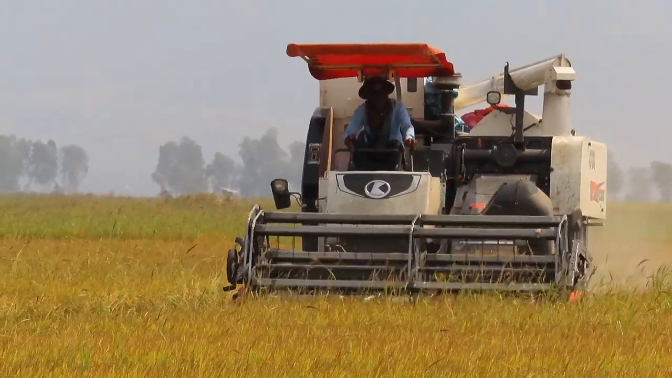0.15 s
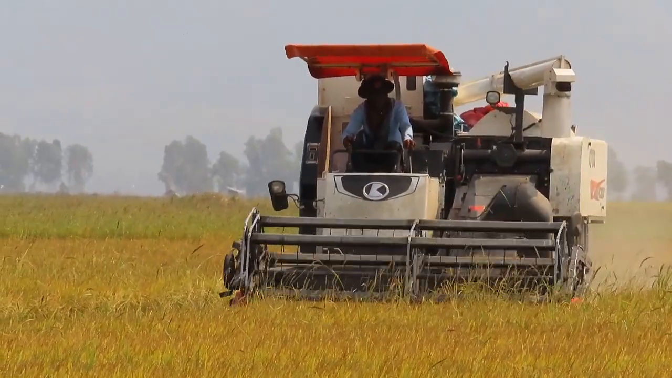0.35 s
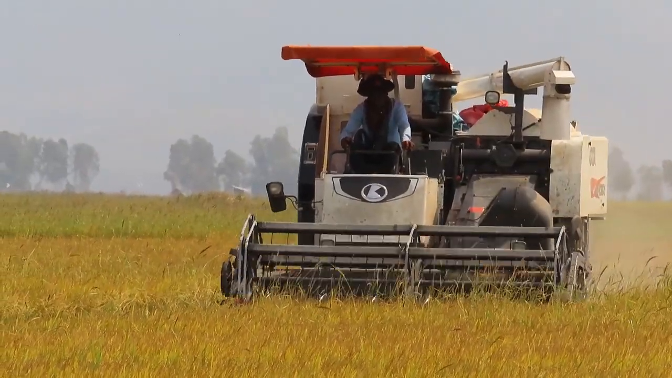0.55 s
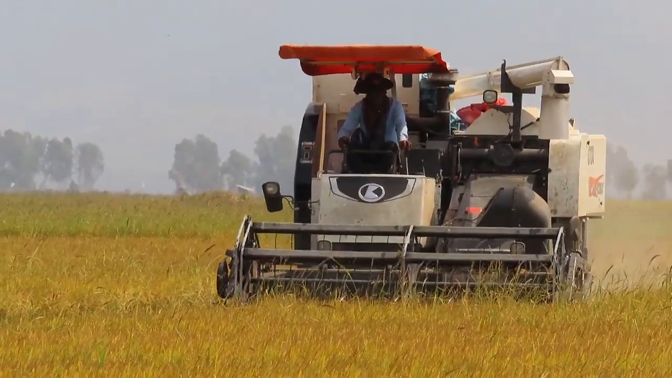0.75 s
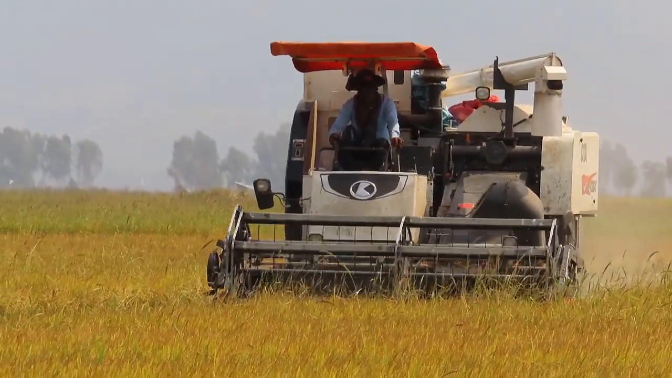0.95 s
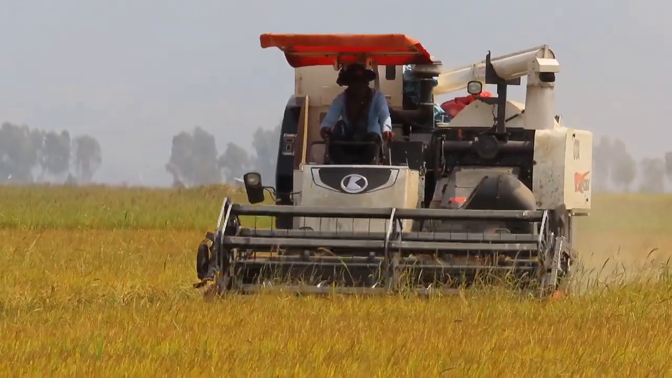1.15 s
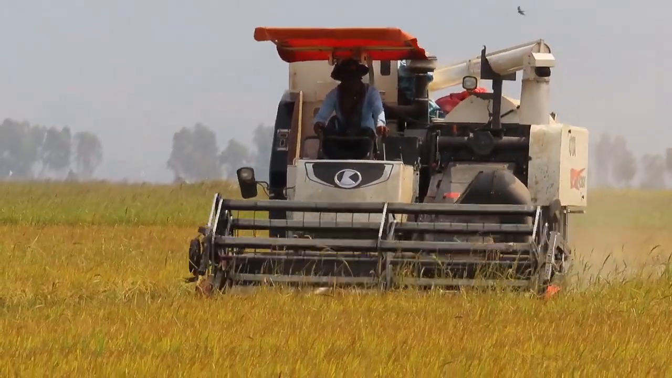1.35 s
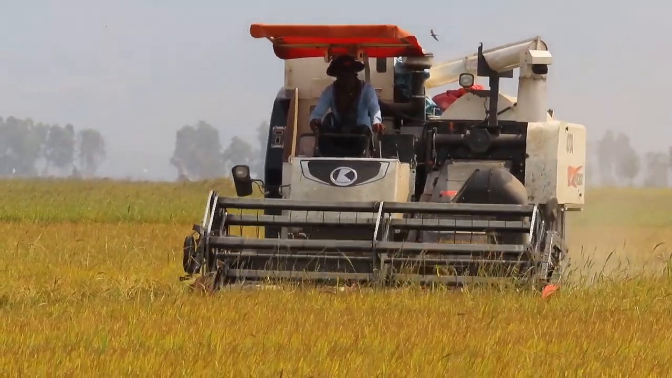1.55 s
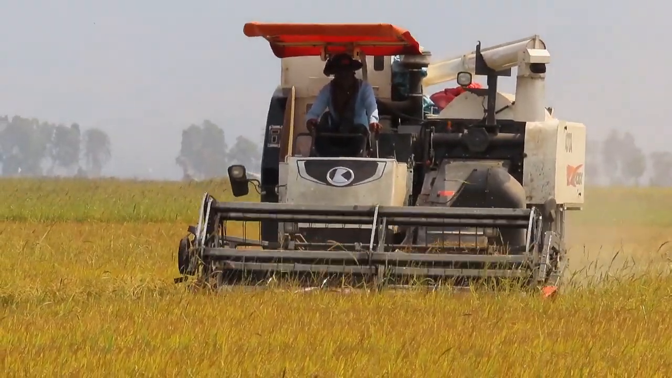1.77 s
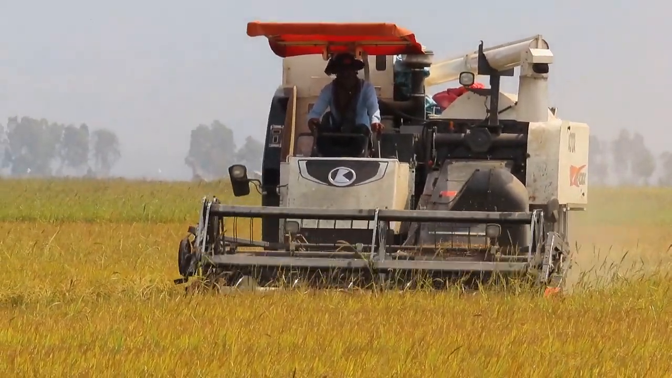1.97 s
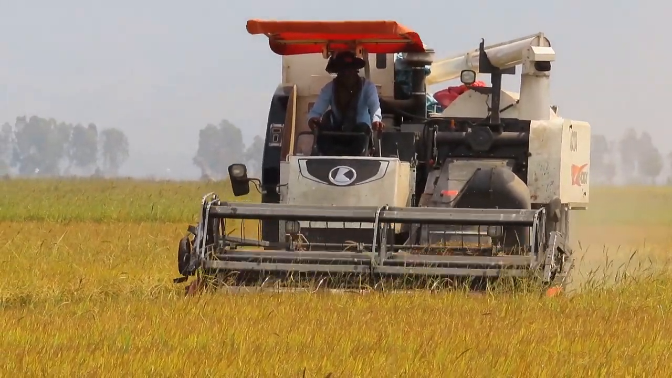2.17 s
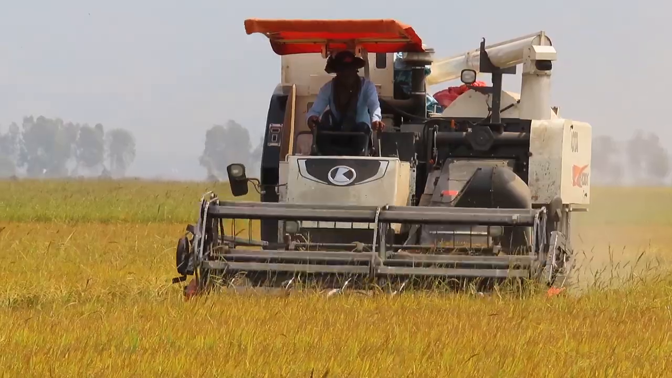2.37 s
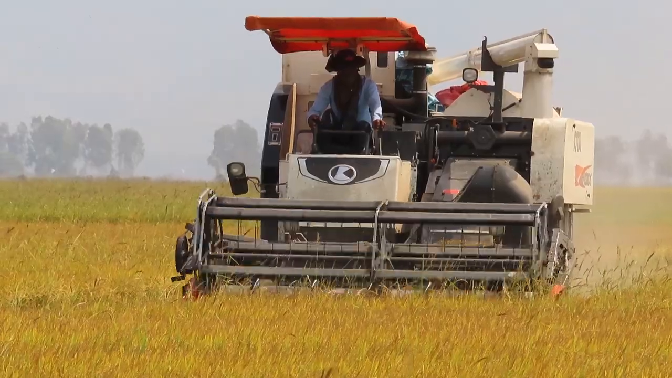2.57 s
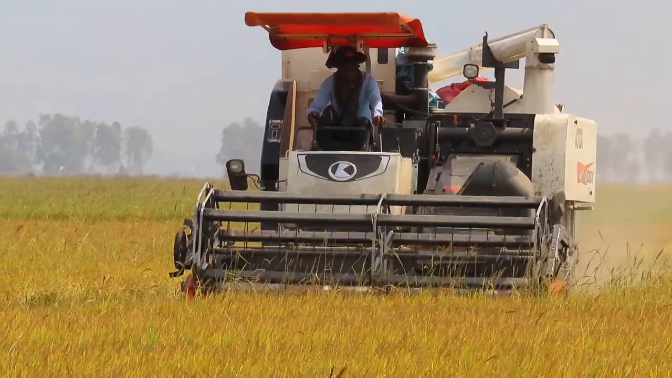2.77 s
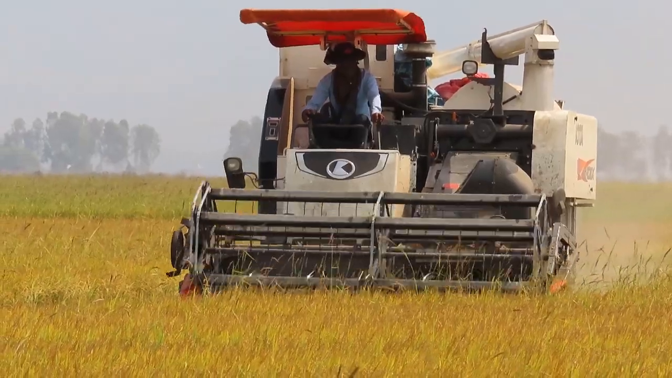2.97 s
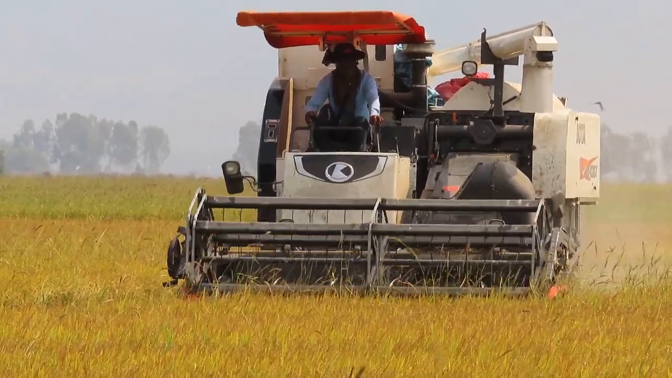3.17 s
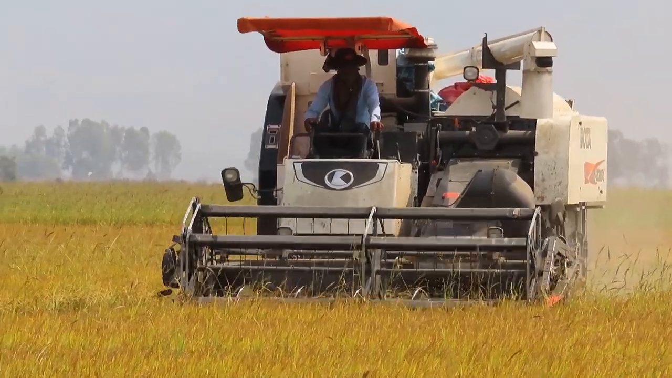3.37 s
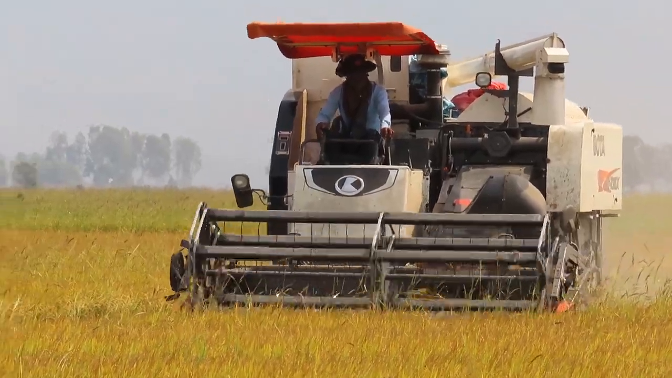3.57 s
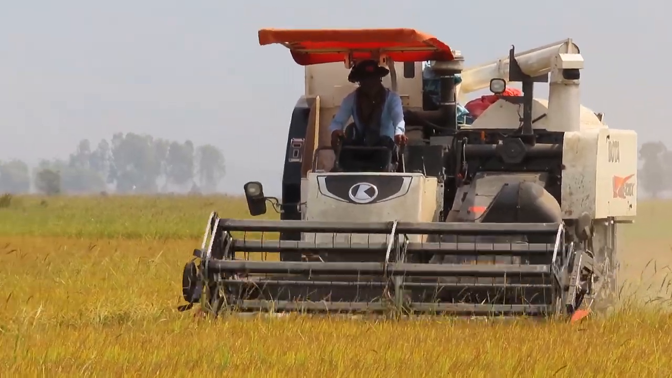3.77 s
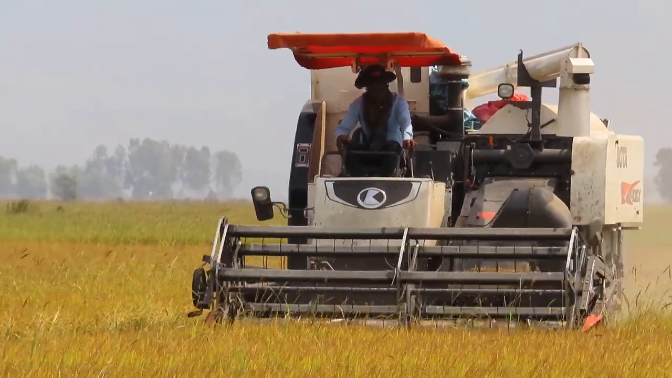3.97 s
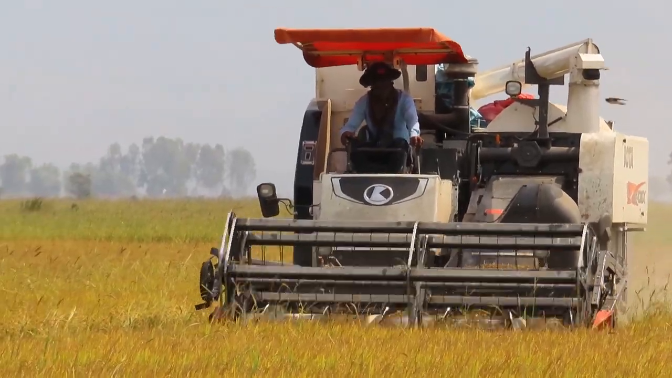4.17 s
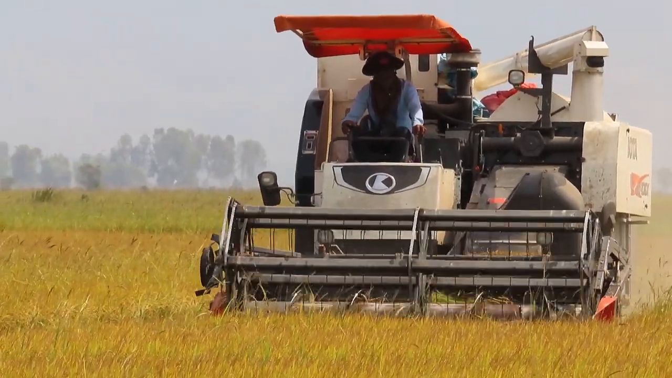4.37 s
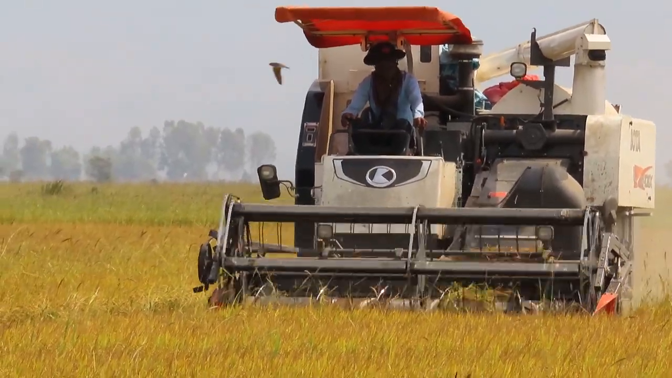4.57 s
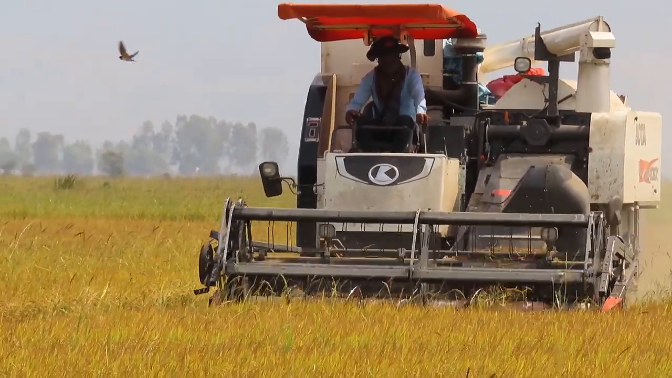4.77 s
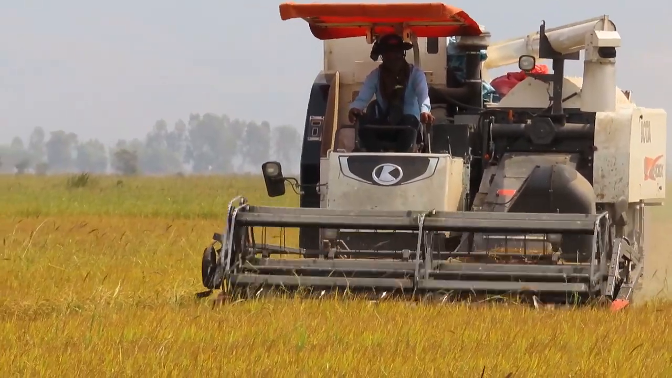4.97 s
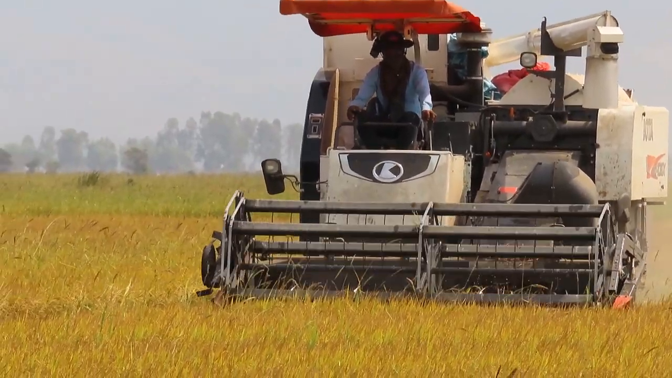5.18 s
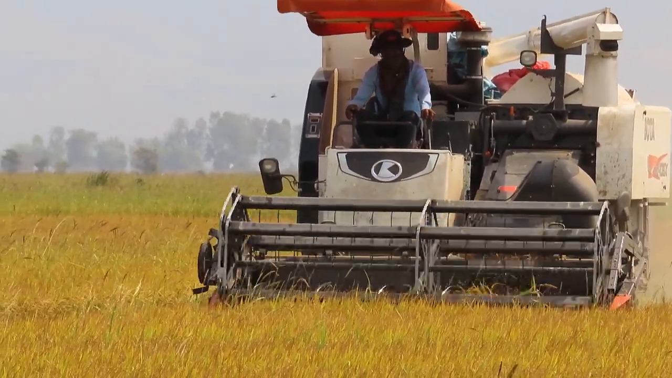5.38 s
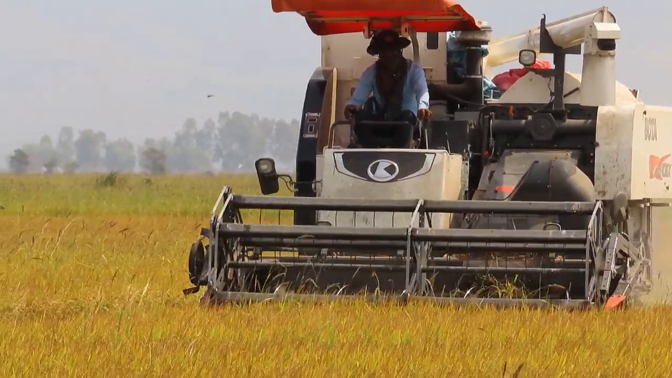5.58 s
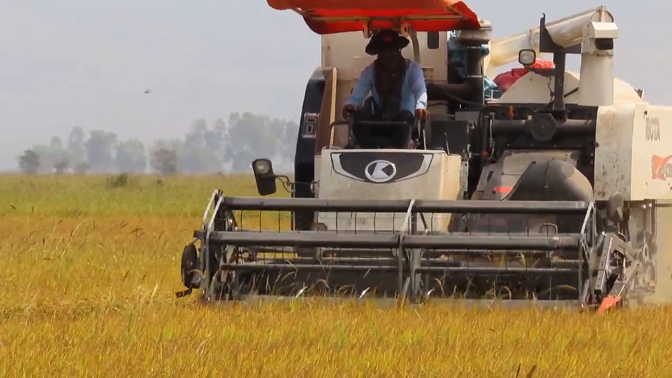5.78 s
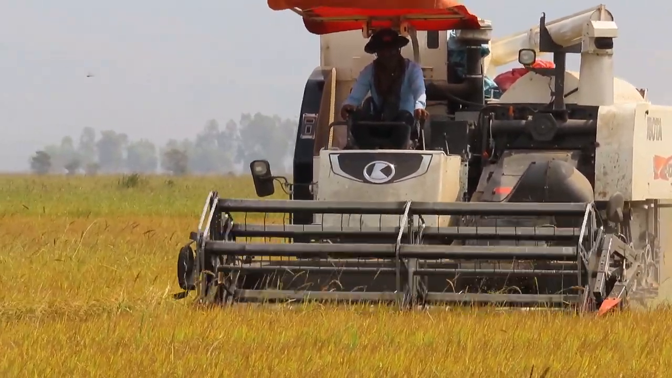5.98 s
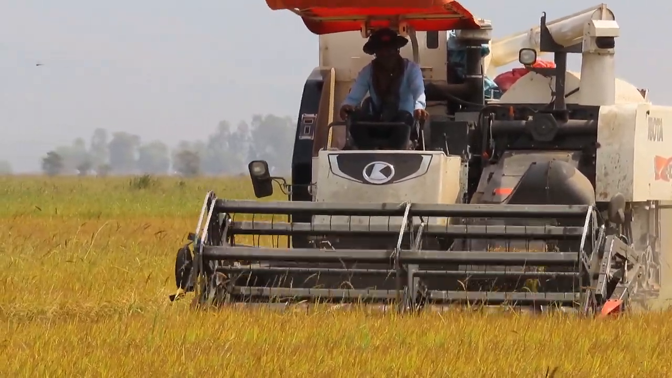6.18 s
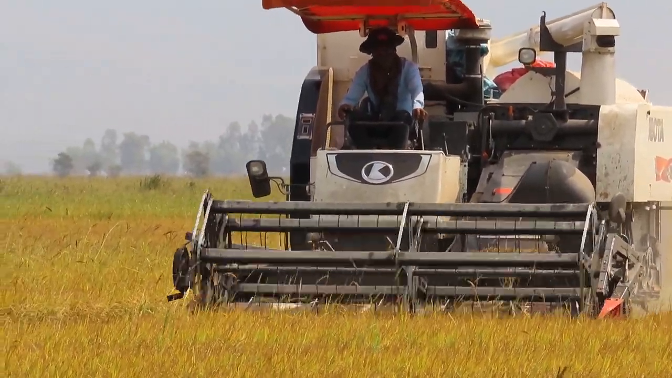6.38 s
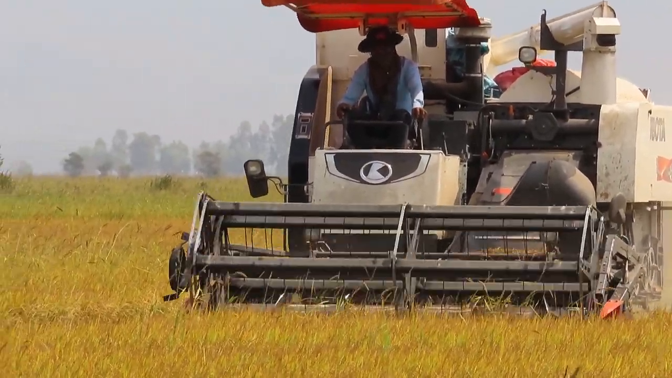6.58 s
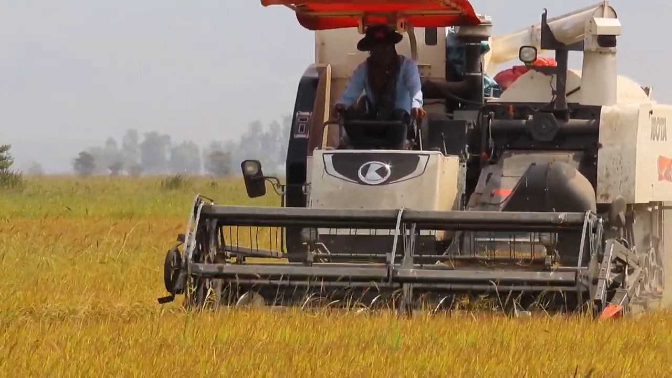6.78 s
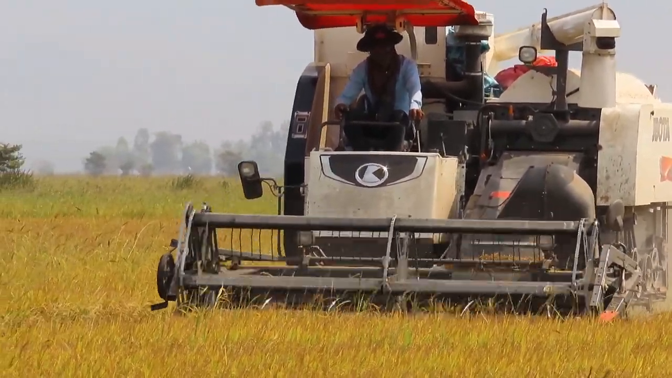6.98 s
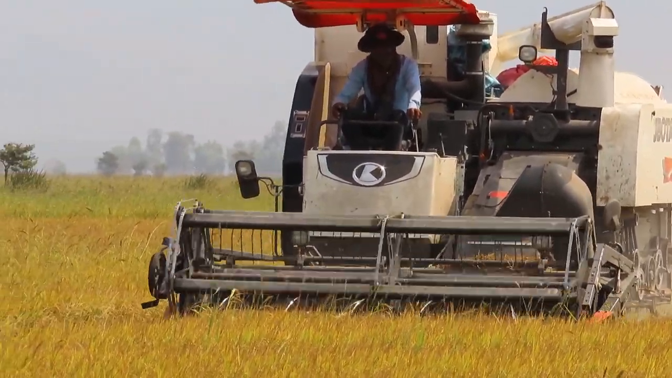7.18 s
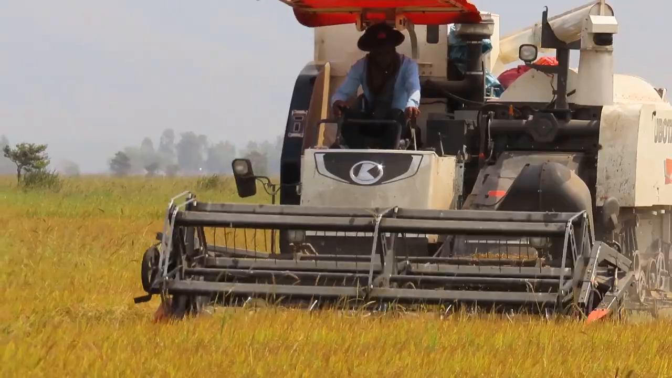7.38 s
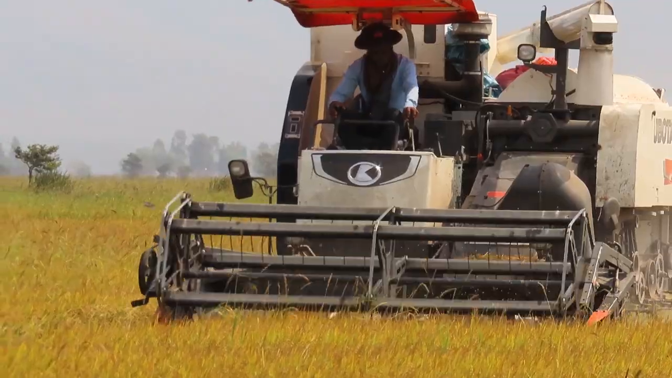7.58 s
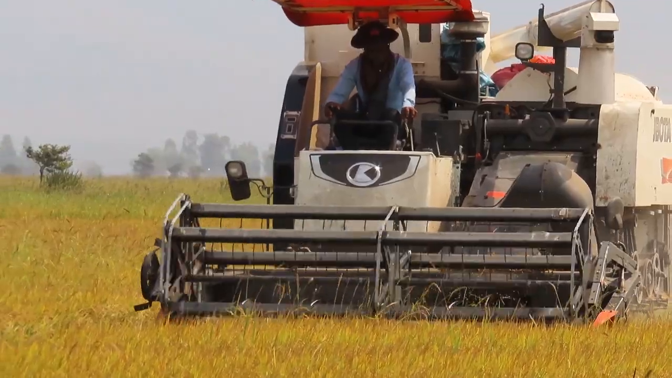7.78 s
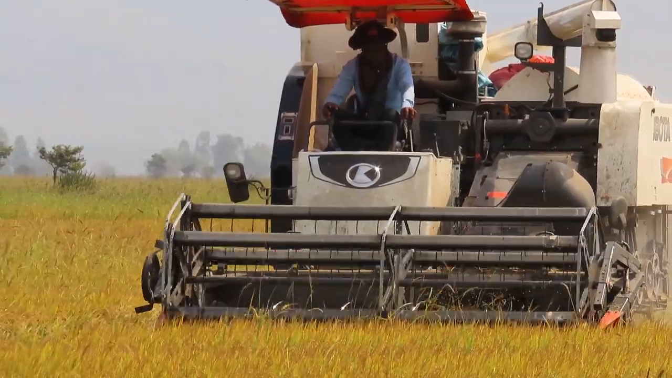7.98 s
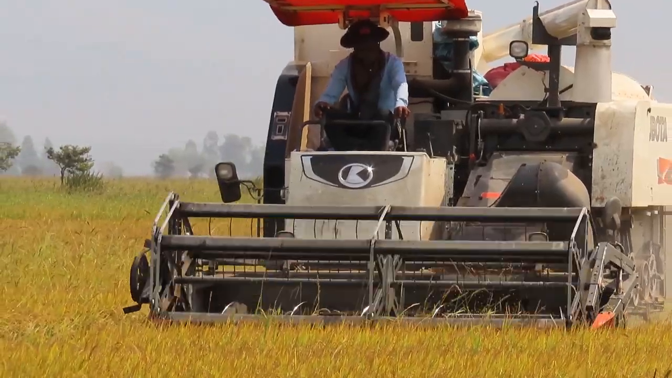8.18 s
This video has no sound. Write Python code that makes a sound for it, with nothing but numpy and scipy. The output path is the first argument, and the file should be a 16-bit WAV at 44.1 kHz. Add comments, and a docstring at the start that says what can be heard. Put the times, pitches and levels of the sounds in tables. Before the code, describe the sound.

A combine harvester runs throughout, about thirty metres off in an open field, slowly nearing the microphone and growing louder. Its diesel holds a steady low drone under the hum and drumming of the thresher, rattling sieves and clattering chains. The bass steps up at about 2.5, 5 and 7 seconds, with the tracks rumbling more heavily in the later part. Brief clinks of loose steel come near 1 second, then several between 4.4 and 5.7 and around 7 to 7.5. The hiss of cut straw builds from about 5 seconds, with short crunches of stalks between 5.3 and 6, and a crunch and soft swish near 7. A small bird gives sharp, high chirps, in a quick run for the first 1.5 seconds, then in pairs until 6.3. A second bird adds short pips around 2, 6.5 and 7.8 seconds. A faint field hiss lies underneath.

```python
"""A four-cylinder diesel drones throughout, under the drumming and rattle of a tracked rice combine
some 30 m off in an open field, creeping towards the microphone. Its threshing gear hums and drums on the
sheet-metal body, tracks rumble, sieves rattle, chains clatter and the knife shears hissing straw.
Small birds flit past with sharp double chirps and a few short pips, over the faint hiss of the field."""
import sys
import numpy as np
from scipy import signal
from scipy.fft import rfft, irfft
from scipy.io import wavfile

SR = 44100
rng = np.random.default_rng(int(sys.argv[2]) if len(sys.argv) > 2 else 0)


def transcribe(signal):
    """Save signal, clipped to [-1, 1], as a 16-bit WAV file at the path in sys.argv[1]."""
    frames = np.atleast_2d(signal).T
    limited = np.clip(frames, -1, 1)
    pcm = np.round(limited * 32767).astype(np.int16)
    wavfile.write(sys.argv[1], SR, pcm)


N = 363384
TIME = np.arange(N) / SR
FREQS = np.maximum(np.arange(N // 2 + 1) * SR / N, 1)
START_M, DRIVE_M_PER_S = 33, 0.65  # first distance from the microphone, ground speed

# governed speed of the diesel: (time [s], firing rate [Hz])
FIRING_RATE = [(0, 85.3), (.35, 85.5), (.9, 87.1), (2.4, 86.4), (3.4, 86.5), (4.25, 87.1), (4.75, 86.3),
               (5.4, 87.2), (6.1, 86.6), (6.65, 87), (7.5, 87.2), (8.1, 86.6)]
# exhaust drone: (multiple of the firing rate, level [dB])
ENGINE_ORDERS = [(1, -0.5), (1.5, -12.5), (2, -7.5), (3, -13.5), (4, -17.5), (5, -21), (6, -24), (8, -32)]
# the bass grows in sudden steps: (time [s], track step [dB], exhaust step [dB], drumming step [dB])
BASS_STEPS = [(2.5, 1, 6.5, 4), (4.5, 2.5, 4.5, 1.45), (5.0, 12.5, 2.5, 3.5), (6.0, -2.5, 1.5, -0.5),
              (7.0, 13.5, 3.5, 0)]
# threshing fan and drum bars: (multiple of the blade or bar rate, level [dB])
FAN_HUM = [(1, -11.5), (2, -15)]
BAR_GROWL = [(2, -22), (3, -21), (4, -15.5), (5, -25.5), (6, -22.5), (9, -35)]
# resonances of body panels and loose steel parts: (frequency [Hz], width [Hz], gain [dB])
PANEL_MODES = [(269, 15, 0.5), (302.4, 93, 3), (349, 16, 2.5), (457, 19, 1.5), (533, 30, 3), (715, 27, 1)]
STEEL_MODES = [(720, 22, -9.5), (1250, 32, -13), (1460, 18, -2), (1630, 40, -5), (2220, 65, -5.5),
               (2710, 37, -10.5)]
# evenly spaced treble peaks colouring the straw's hiss and swish: (frequency [Hz], width [Hz], gain [dB])
GROUND_ECHO_PEAKS = [(6200, 350, 4), (7630, 400, 3.5), (8900, 450, 5.5), (10250, 500, 3), (11400, 450, 4.5),
                     (12500, 400, 4)]
# bands that cancel over the field on the way to the microphone: (frequency [Hz], width [Hz], gain [dB])
FIELD_DIPS = [(584, 35, -9.5), (1055.5, 100, -15)]
# colour of the faint stereo spread: (frequency [Hz], relative side level [dB])
STEREO_WIDTH = [(40, -20), (150, -59), (500, -19), (1500, -16.5), (8000, -26)]
# colour of each source: (frequency [Hz], relative density [dB])
BODY_COLOUR = [(70, -7), (100, -6.5), (140, 2.5), (260, 1), (340, -6), (400, -10), (500, -16.5)]
TRACK_COLOUR = [(15, -30), (30, 7), (42, 13), (52, 10.5), (75, 12.5), (110, 18.5), (200, -13)]
SIEVE_COLOUR = [(330, -8), (410, -5), (540, -3), (600, -10), (700, -4), (830, -7.5), (980, -9.5),
                (1200, -15)]
CHAIN_COLOUR = [(950, 1.5), (1150, 5.5), (1300, 4), (1600, 0), (1850, -6), (2400, -8.5), (2550, -13.5),
                (2900, -13), (3250, -21)]
KNIFE_COLOUR = [(2800, -2), (3300, -11.5), (3680, 1), (4300, -3), (4520, -11.5), (4750, -7.5), (5250, -8.5),
                (5900, -15), (6500, -18), (8000, -16)]
STRAW_COLOUR = [(5000, -23), (5950, -5), (6150, 3), (6850, 7.5), (7000, 3.5), (7600, 2), (8350, -5.5),
                (8700, -6.5), (9600, -7), (11000, -11.5), (12800, -12), (14500, -15), (15500, -24)]
AIR_COLOUR = [(700, -17), (1700, 4), (4000, -0.5), (7000, -8), (10000, -12), (14000, -22), (15500, -25)]
SWISH_COLOUR = [(6200, -3), (7600, 1.5), (9000, -6), (12000, -15), (15000, -15)]
# passing swells and dips: (time [s], half-width [s], gain [dB])
CROP_WADS = [(2.62, 0.025, 4.5), (2.76, 0.011, 9.5), (3.19, 0.013, 3.5), (3.55, 0.075, 2),
             (5.055, 0.013, 2), (5.22, 0.021, 1), (5.37, 0.0064, 4.5), (5.46, 0.057, 3), (6.17, 0.088, 1.5),
             (7.18, 0.073, 4), (7.39, .05, 1.5)]  # wads hit the threshing drum
THRESHER_LULLS = [(3.8, 0.038, -5), (4.02, 0.064, -3.5), (4.75, 0.055, -4.5), (5.12, .04, -1.5),
                  (6.48, 0.053, -3), (7.55, .05, -1), (7.86, .05, -2)]  # the drumming slackens
TRACK_BUMPS = [(.07, 0.088, 10), (.42, 0.079, 12), (5.38, .15, 5), (5.93, 0.07, 4), (7.19, 0.062, 1),
               (7.62, 0.041, 5.5)]  # the tracks jolt over bumps
GRAIN_HEAPS = [(1.02, 0.38, 2.5), (2.76, 0.13, 3), (3.88, 0.27, 2), (4.38, 0.19, 2), (6.25, 0.083, 2)]  # heaps rattle over the sieves
THICK_CROP = [(1.82, 0.41, 3.5), (3.42, 0.27, 5.5), (4.04, 0.2, 3.5), (4.6, 0.32, 3), (5.74, 0.45, 4),
              (7.06, 0.38, 6.5), (7.85, 0.23, 3.5)]  # the knife meets thicker crop
# chain clatter coming and going over the crop: (time [s], level [dB])
CHAIN_LEVEL = [(0.1, -52.5), (1.2, -46.5), (1.29, -49), (2.32, -51), (3.1, -47), (3.25, -43.5), (3.7, -42),
               (4.41, -44), (4.45, -41), (4.76, -43.5), (5.5, -39), (6.02, -41), (6.38, -38.5),
               (7.21, -37.5), (8.15, -39.5)]
# near bird, second bird and dry bearing: (time [s], relative level [dB], settled pitch [Hz])
CHIRPS = [(.2304, -44.5, 6340), (.3965, -48, 6360), (.5715, -51.5, 6300), (.7568, -50.5, 6360),
          (.9238, -48, 6250), (1.1313, -50, 6370), (1.3154, -50.5, 6240), (1.5489, -47.5, 6440),
          (2.0672, -49.5, 6510), (2.2667, -46.5, 6430), (2.803, -47.5, 6360), (3.024, -48, 6330),
          (3.6027, -51, 6370), (3.8182, -50.5, 6400), (4.4149, -44, 6400), (4.6369, -47, 6380),
          (5.221, -53, 6450), (5.4375, -50, 6490), (6.0876, -47, 6500), (6.2976, -47, 6480)]
PIPS = [(2.021, -51, 4380), (2.035, -46.5, 4330), (2.178, -54, 4350), (6.456, -39.5, 4330),
        (7.843, -40, 4400)]
SQUEAKS = [(3.213, -43, 1990)]
# their glides: (time into the sound [s], nominal pitch [Hz], relative level [dB])
FLICK_GLIDE = [(-.0005, 5000, -18), (.001, 7140, 6.5), (.0025, 7200, -2), (.0042, 4600, -3)]  # an arched flick opens each chirp
NOTE_GLIDE = [(.0143, 5360, -2), (.016, 7900, 2), (0.018, 6670, -0.5), (.022, 6490, 4), (.029, 6350, -4),
              (.031, 6300, -26)]  # then a note leaps up, drops and holds
PIP_GLIDE = [(0, 4170, -25), (.004, 4420, 6), (.009, 4400, -0.5), (.016, 4350, -14)]
SQUEAK_GLIDE = [(0, 1970, -18), (.006, 2005, 1), (.014, 2030, -5), (.024, 2000, -20)]
# where the near bird is in front of the microphone: (time [s], left minus right [dB])
BIRD_PAN = [(0, 4), (2.3, 2), (3.8, 0), (6.1, -1)]
# hard knocks on loose steel: (time [s], relative level [dB], ringing pitch [Hz])
CLINKS = [(.912, -31, 704), (1.08, -51, 2140), (2.738, -37, 695), (4.43, -28, 733), (5.192, -28, 695),
          (5.26, -28, 710), (5.362, -29, 915), (5.652, -24, 694), (6.935, -34, 1820), (7.166, -26, 720),
          (7.325, -25, 700), (7.444, -28, 1416)]
# straw sweeps over the header: (time [s], half-width [s], level [dB])
SWISHES = [(1.8, 0.41, -63), (7.083, .22, -55.5)]
# tough stalks in the knife: (time [s], half-width [s], level [dB], band centre [Hz])
CRUNCHES = [(3.41, .025, -61, 6800), (4.598, .014, -52, 3960), (5.353, 0.017, -46, 2700),
            (5.51, 0.013, -43, 2500), (5.705, .013, -41.5, 3780), (5.815, 0.018, -47, 3700),
            (5.855, .014, -47, 3800), (6.904, 0.027, -43.5, 3580)]


def from_db(db):
    """Decibels to gain."""
    return 10 ** (np.asarray(db) / 20)


def rms_one(x):
    """Scale to unit rms."""
    return x / np.sqrt(np.mean(x ** 2) + 1e-20)


def in_time(rows, t=TIME):
    """Each column of a curve, joined by straight lines."""
    times, *columns = np.transpose(rows)
    return [np.interp(t, times, column) for column in columns]


def spectrum_db(points):
    """A colour joined by straight lines over log frequency, falling away beyond its ends."""
    hz, db = np.transpose(points)
    octaves_out = np.abs(np.log2(FREQS / np.clip(FREQS, hz[0], hz[-1])))
    return np.interp(np.log(FREQS), np.log(hz), db) - 30 * octaves_out


def bells_db(rows):
    """Bell-shaped peaks or dips over frequency."""
    return sum(db / (1 + (2 * (FREQS - hz) / width) ** 2) for hz, width, db in rows)


def swells_db(rows):
    """Bell-shaped swells or dips over time."""
    return sum(db * np.exp(-((TIME - s) / half_width) ** 2) for s, half_width, db in rows)


def rise(at_s, length_s):
    """A smooth passage from 0 to 1 round this moment."""
    return .5 + .5 * np.tanh(2 * (TIME - at_s) / length_s)


def approach(far_db, near_db):
    """A level that goes from its first to its last value with the log of the microphone distance."""
    closer = np.log(START_M / np.maximum(START_M - DRIVE_M_PER_S * TIME, 1))
    return far_db + (near_db - far_db) * closer / closer[-1]


def drift(rate_hz):
    """A slow random wander of unit rms."""
    return rms_one(irfft(rfft(rng.standard_normal(N)) / (1 + (FREQS / rate_hz) ** 2), N))


def angle(hz):
    """Running phase of a shaft or tone at this rate, in radians."""
    return 2 * np.pi * np.cumsum(hz) / SR


def impacts(per_s, spread_db):
    """Two unrelated streams of random blows of uneven size."""
    sizes_db = spread_db * np.minimum(rng.exponential(1, (2, N)), 4)
    signs = rng.choice([-1, 1], (2, N))
    struck = rng.random((2, N)) < per_s / SR
    return rms_one(from_db(sizes_db) * signs * struck)


def radiate(blows, colour, peaks=PANEL_MODES):
    """Blows take a part's colour and cross the field: nearly mono, with a faint spread that grows."""
    mid, side = rfft(blows) * from_db(spectrum_db(colour) + bells_db(peaks) + bells_db(FIELD_DIPS))
    mid, side = irfft(np.array([mid, side * from_db(spectrum_db(STEREO_WIDTH))]), N)
    side = side * from_db(approach(-33, 3))  # side gain in dB, first to last
    return rms_one(np.array([mid + side, mid - side]))


def tilt(x, pivot_hz, bass_db):
    """Shift the bass against the treble, round a pivot."""
    bass = signal.sosfiltfilt(signal.butter(2, pivot_hz, fs=SR, output="sos"), x)
    return from_db(bass_db / 2) * bass + from_db(-bass_db / 2) * (x - bass)


def tones(rate_hz, orders, waver_db, wobble_rad, waver_hz):
    """Multiples of a machine rate; the higher ones waver more in level and phase."""
    out = 0
    for multiple, db in orders:
        unsteady = np.sqrt(multiple)
        wobble = wobble_rad * unsteady * drift(waver_hz)
        phase = multiple * angle(rate_hz) + wobble + rng.uniform(0, 2 * np.pi)
        level_db = db + waver_db * unsteady * drift(waver_hz)
        out = out + from_db(level_db) * np.sqrt(2) * np.sin(phase)
    return out


def whistle(calls, glide, octave_db):
    """A gliding tone with a faint octave; each repeat starts alike and bends towards its own pitch."""
    out = np.zeros(N)
    t = np.arange(glide[0][0], glide[-1][0], 1 / SR)
    hz, glide_db = in_time(glide, t)
    nominal_hz = hz[-len(t) // 2:].mean()
    bend = np.minimum(np.linspace(0, 2, len(t)), 1)
    for s, db, settled_hz in calls:
        start = round((s + t[0]) * SR)
        phase = angle(hz * (settled_hz / nominal_hz) ** bend)
        tone = np.sin(phase) + from_db(octave_db) * np.sin(2 * phase)
        out[start:start + len(t)] += from_db(db + glide_db) * tone
    return out


def diesel(firing_hz, step_db):
    """The exhaust drones across the field on the firing rate; uneven cylinders add a half order."""
    level_db = approach(far_db=-43.5, near_db=-38.5) + step_db + 0.21 * drift(6.7)
    return from_db(level_db) * tones(firing_hz, ENGINE_ORDERS, waver_db=.75, wobble_rad=.1, waver_hz=5)


def thresher(firing_hz, step_db):
    """Crop and engine puffs drum on the body, boomier as it nears; drum bars growl and the fan hums."""
    level_db = approach(far_db=-32.5, near_db=-25.5) + step_db + 0.4 * drift(23)
    level_db += swells_db(CROP_WADS) + swells_db(THRESHER_LULLS)
    blade_hz, bar_hz = 2.043 * firing_hz, .909 * firing_hz
    puffs = from_db(1.47 * np.cos(angle(firing_hz)) + 0.85 * np.cos(angle(firing_hz / 2)))
    drumming = from_db(-1.5) * radiate(impacts(per_s=5000, spread_db=1.5) * puffs, BODY_COLOUR)
    hum = tones(blade_hz, FAN_HUM, waver_db=1.8, wobble_rad=.24, waver_hz=3)
    growl = tones(bar_hz, BAR_GROWL, waver_db=1.2, wobble_rad=.35, waver_hz=3)
    boom_db = approach(far_db=-8.5, near_db=6.0)
    return from_db(level_db) * tilt(drumming + hum + growl, pivot_hz=221, bass_db=boom_db)


def tracks(step_db):
    """The tracks rumble on soft ground and jolt over bumps."""
    level_db = approach(far_db=-51.0, near_db=-54.0) + step_db + swells_db(TRACK_BUMPS) + 1.2 * drift(4.4)
    return from_db(level_db) * radiate(impacts(per_s=1400, spread_db=4.0), TRACK_COLOUR)


def sieves(shake, step_db):
    """Grain rattles over the shaking sieves, now and then in heaps."""
    level_db = approach(far_db=-40.93, near_db=-36.43) + step_db + swells_db(GRAIN_HEAPS) + .5 * drift(12)
    grains = impacts(per_s=3000, spread_db=1.83) * from_db(0.32 * shake + 0.86 * drift(5.1))
    return from_db(level_db) * radiate(grains, SIEVE_COLOUR)


def chains(shake):
    """Links knock over sprockets amid loose steel, brighter as less crop screens the microphone."""
    level_db, = in_time(CHAIN_LEVEL)
    knocks = impacts(per_s=9000, spread_db=2.5) * from_db(0.37 * shake + .5 * drift(14))
    bass_db = approach(far_db=-3.0, near_db=-13.5)
    links = tilt(radiate(knocks, CHAIN_COLOUR), pivot_hz=1530, bass_db=bass_db)
    return from_db(level_db - 0.98) * (links + from_db(-10) * loose_steel(knocks_per_s=14))


def loose_steel(knocks_per_s):
    """Each loose part is knocked at its own uneven moments and rings briefly."""
    out = 0
    for hz, width, db in STEEL_MODES:
        knocks = rng.uniform(0.34, 1, N) * (rng.random(N) < knocks_per_s / SR)
        ringing = irfft(rfft(knocks) / (1 + 1j * hz / width * (FREQS / hz - hz / FREQS)), N)
        out = out + from_db(db) * rms_one(ringing)
    return rms_one(out)


def cutter(stroke_hz):
    """Countless stalks snap at each stroke of the knife and rustle up into the machine in bunches."""
    clear = rise(at_s=5.45, length_s=0.99)  # the bar comes clear of the standing crop
    thick_db = swells_db(THICK_CROP)
    knife_db = approach(far_db=-61.5, near_db=-55.5) + 6.9 * clear + 0.91 * thick_db
    straw_db = approach(far_db=-69.5, near_db=-64.0) + 9.8 * clear + thick_db
    stroke = np.cos(angle(stroke_hz))
    bunches_db = .8 * drift(7)
    snaps_db = 0.25 * stroke + 0.96 * drift(13) + bunches_db / 2
    knife = radiate(impacts(per_s=22000, spread_db=4.0) * from_db(snaps_db), KNIFE_COLOUR)
    rustle = impacts(per_s=27000, spread_db=2.0) * from_db(stroke + 0.36 * drift(14) + bunches_db)
    straw = radiate(rustle, STRAW_COLOUR, GROUND_ECHO_PEAKS)
    return from_db(knife_db) * knife + from_db(straw_db) * straw


def air(level_db):
    """Faint field hiss from all round the microphone, unrelated in the two channels."""
    spectrum = rfft(rng.standard_normal((2, N))) * from_db(spectrum_db(AIR_COLOUR))
    return from_db(level_db) * rms_one(irfft(spectrum, N))


def birds(left_lag_s):
    """A near bird chirps off axis, reaching the left side a little later; a second pips in the centre."""
    chirps = from_db(5.0) * sum(whistle(CHIRPS, part, octave_db=-41) for part in (FLICK_GLIDE, NOTE_GLIDE))
    late = irfft(rfft(chirps) * np.exp(-2j * np.pi * FREQS * left_lag_s), N)
    pan_db, = in_time(BIRD_PAN)
    near_bird = np.array([late * from_db(pan_db / 2), chirps * from_db(-pan_db / 2)])
    return near_bird + whistle(PIPS, PIP_GLIDE, octave_db=-16)


def crop_scatter(x, level_db, t60_s):
    """The standing crop scatters a faint, short tail to each side of the microphone."""
    t = TIME[:SR // 2]
    tail = rng.standard_normal((2, len(t))) * from_db(-60 * t / t60_s)
    tail /= np.sqrt(np.sum(tail ** 2, axis=1, keepdims=True))
    return x + from_db(level_db) * signal.fftconvolve(x, tail, axes=1)[:, :N]


def clinks(t60_s, attack_s):
    """A hard knock sets one steel part ringing for a moment."""
    out, t = np.zeros(N), TIME[:SR // 4]
    envelope = (1 - np.exp(-t / attack_s)) * from_db(-60 * t / t60_s)
    envelope /= envelope.max()
    for s, db, hz in CLINKS:
        start = round(s * SR)
        out[start:start + len(t)] += from_db(db - 4.5) * envelope * np.sin(2 * np.pi * hz * t)
    return out


def swishes():
    """Sheaves slide over the header with a swish, coloured by the ground echo."""
    level = sum(from_db(db) * np.exp(-((TIME - s) / half_width) ** 2) for s, half_width, db in SWISHES)
    scrapes = impacts(per_s=9000, spread_db=4.0) * from_db(.6 * drift(21))
    return level * radiate(scrapes, SWISH_COLOUR, GROUND_ECHO_PEAKS)


def bearing():
    """A dry bearing gives one short squeak."""
    return whistle(SQUEAKS, SQUEAK_GLIDE, octave_db=-25)


def crunches(snaps_per_s, half_band_octaves):
    """A tough bunch of stalks gives way in one short burst of snaps."""
    out, t = np.zeros(N), TIME[:SR // 5]
    hz = np.maximum(np.arange(len(t) // 2 + 1) * SR / len(t), 1)
    for s, half_width, db, centre_hz in CRUNCHES:
        snaps = rng.standard_normal(len(t)) * (rng.random(len(t)) < snaps_per_s / SR)
        band = 1 / (1 + (np.log2(hz / centre_hz) / half_band_octaves) ** 4)
        burst = rms_one(irfft(rfft(snaps) * band, len(t)))
        envelope = np.exp(-((t - t.mean()) / half_width) ** 2)
        start = round((s - t.mean()) * SR)
        out[start:start + len(t)] += from_db(db) * burst * envelope
    return out


def scene():
    """The open field from one spot: an engine paces the nearing combine while birds call."""
    firing_hz, = in_time(FIRING_RATE)
    pace = firing_hz / firing_hz.mean()
    shake = np.cos(angle(hz=8.9 * pace))  # shared by sieves and chains
    steps_db = sum(np.outer(gains_db, rise(s, length_s=.03)) for s, *gains_db in BASS_STEPS)
    rumble_db, drone_db, drumming_db = steps_db
    combine = diesel(firing_hz, drone_db) + thresher(firing_hz, drumming_db) + tracks(rumble_db)
    combine += sieves(shake, 0.34 * drumming_db) + chains(shake) + cutter(stroke_hz=25.0 * pace)
    combine += clinks(t60_s=0.11, attack_s=.016) + swishes() + bearing()
    combine += crunches(snaps_per_s=5000, half_band_octaves=.55)
    calls = crop_scatter(birds(left_lag_s=.000035), level_db=-13, t60_s=.4)
    return combine + calls + air(level_db=-58.0)


def record(dry):
    """The microphone signal is cut steeply above 15650 Hz."""
    return signal.sosfiltfilt(signal.ellip(10, .05, 70, 15650, fs=SR, output="sos"), dry)


dry = scene()
out = record(dry)
transcribe(out)
```